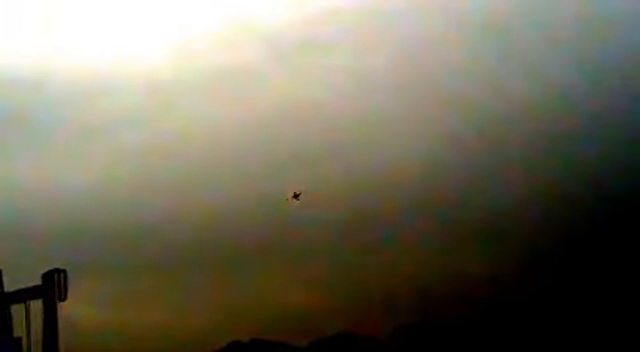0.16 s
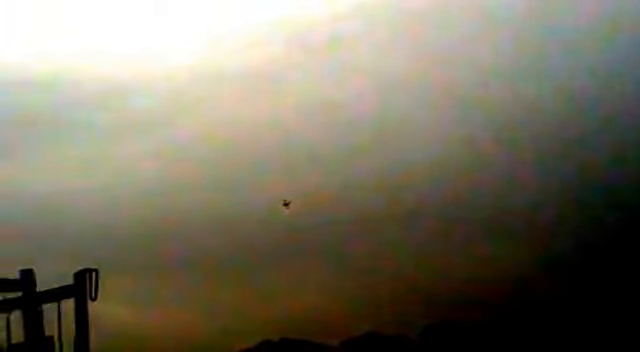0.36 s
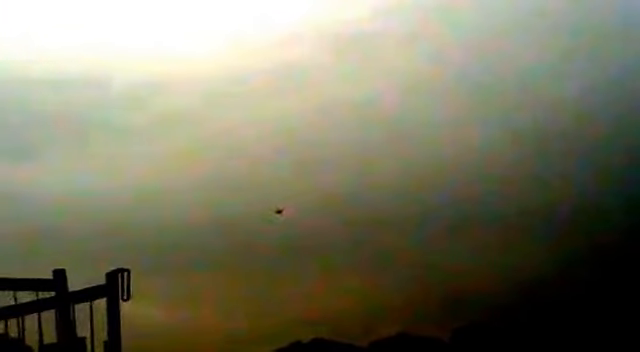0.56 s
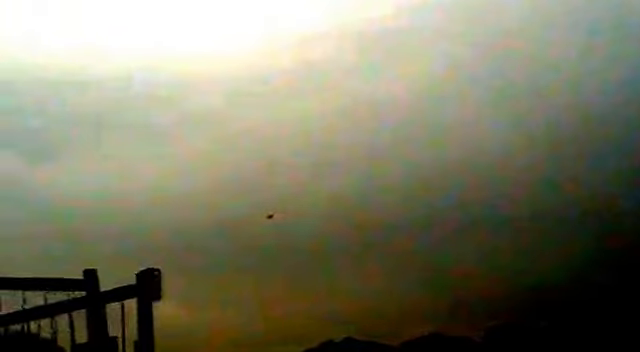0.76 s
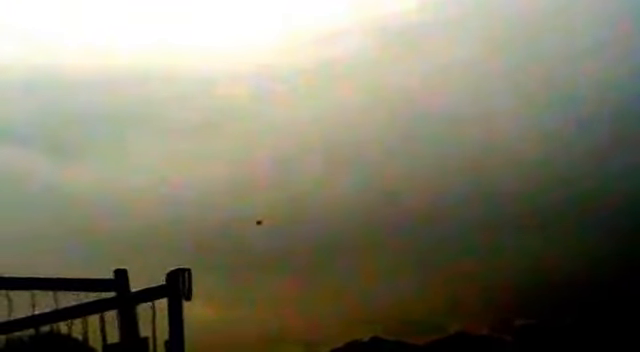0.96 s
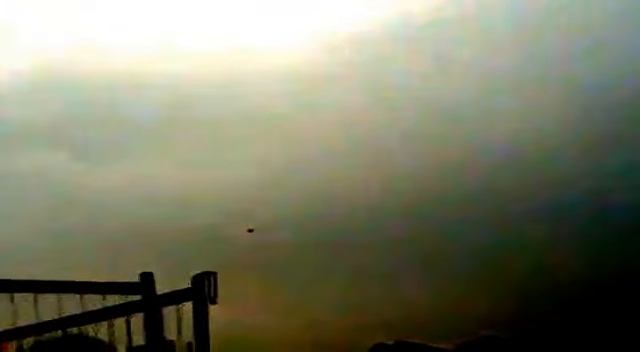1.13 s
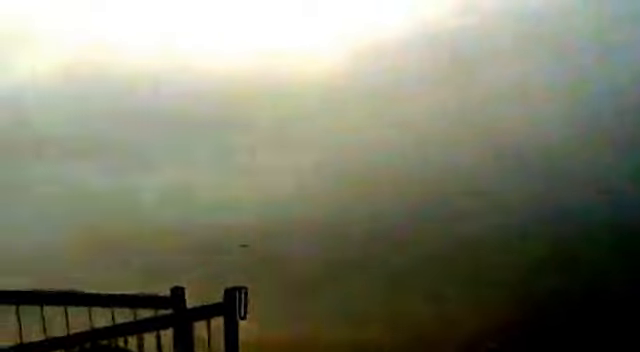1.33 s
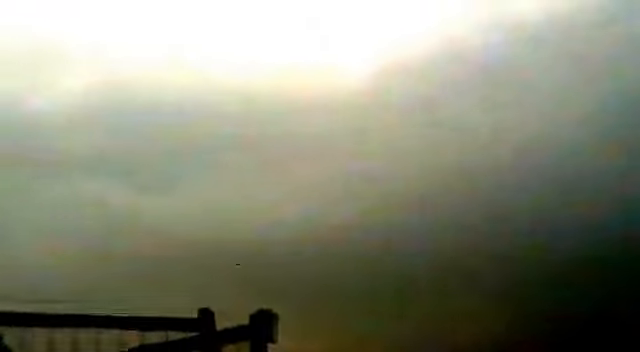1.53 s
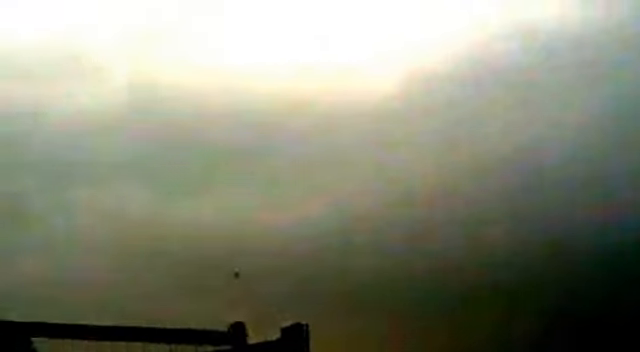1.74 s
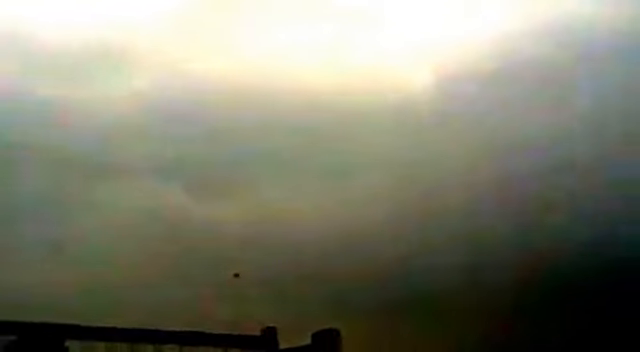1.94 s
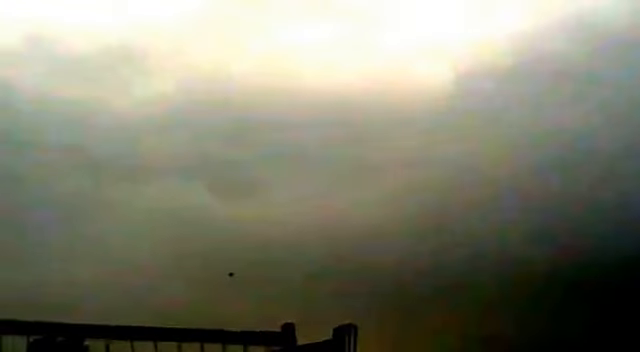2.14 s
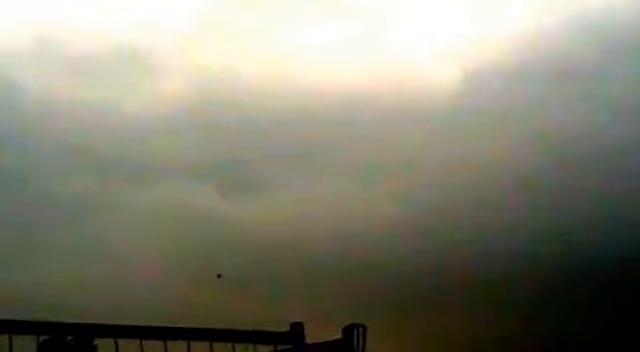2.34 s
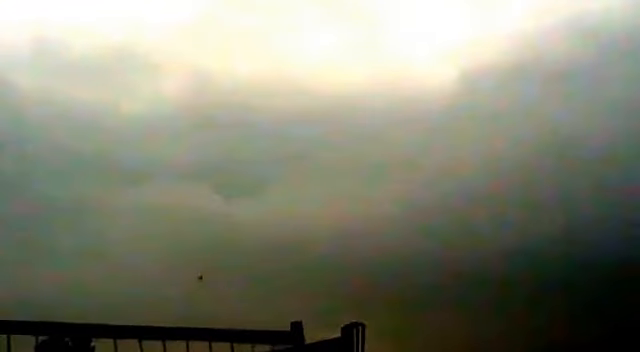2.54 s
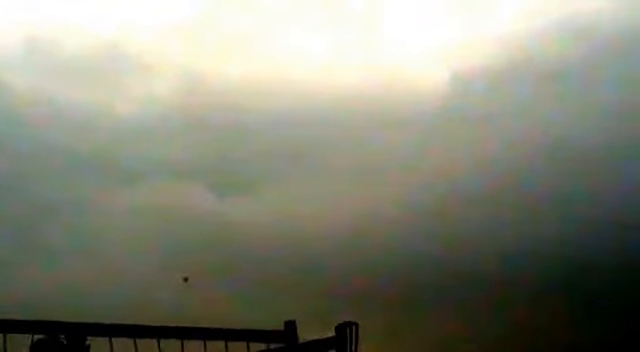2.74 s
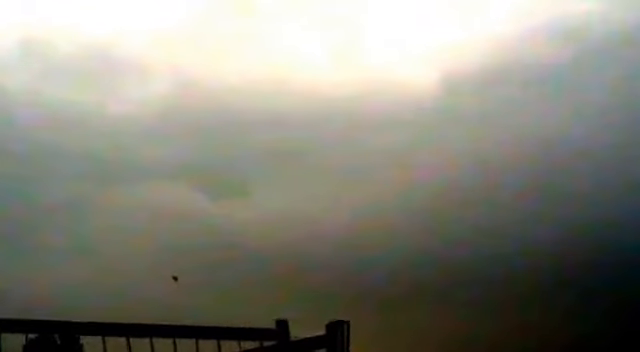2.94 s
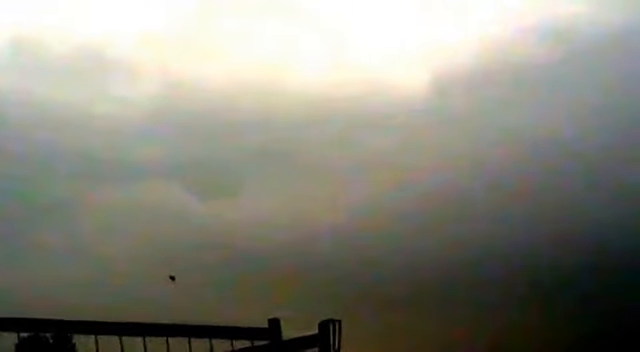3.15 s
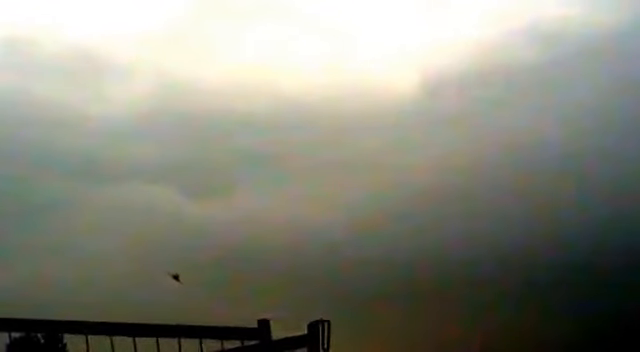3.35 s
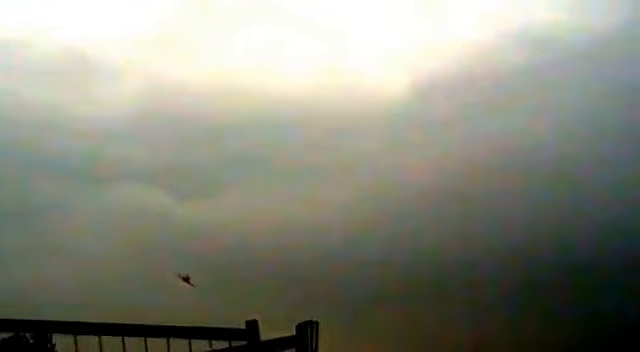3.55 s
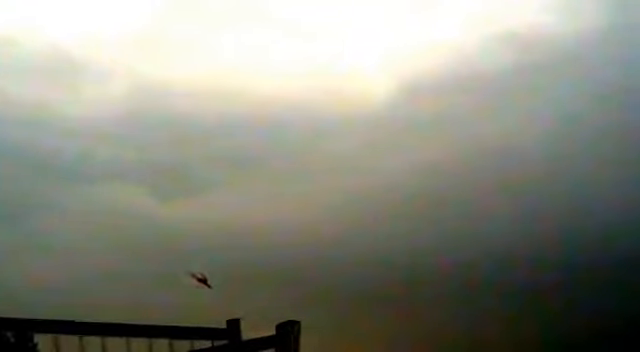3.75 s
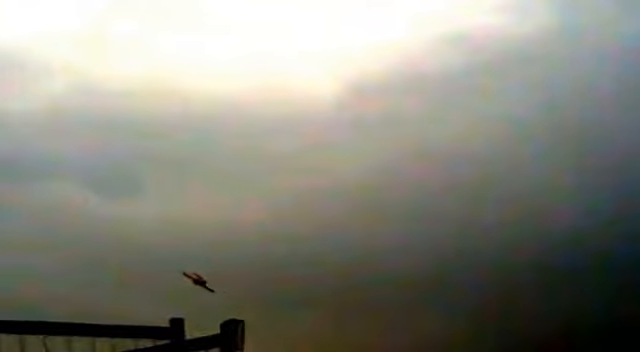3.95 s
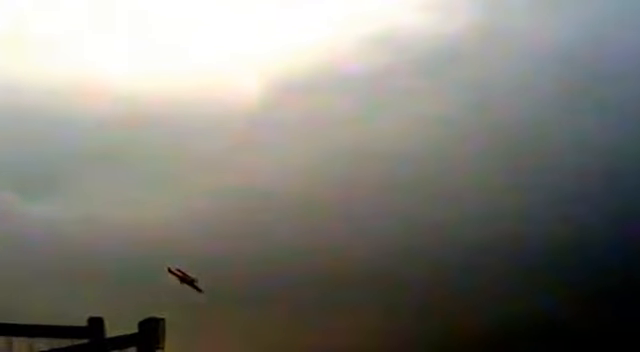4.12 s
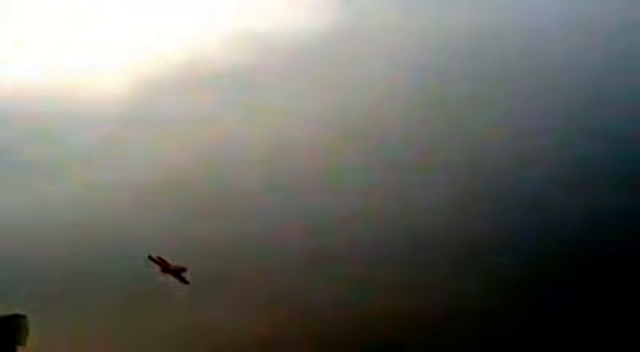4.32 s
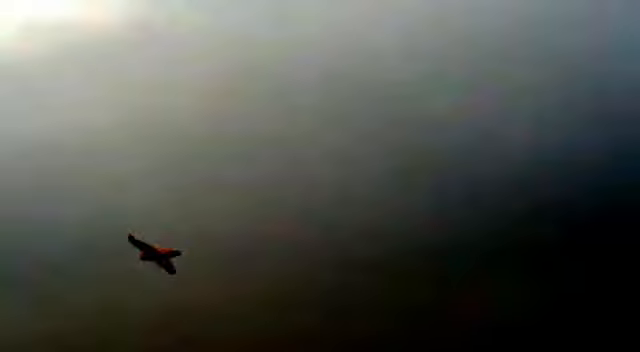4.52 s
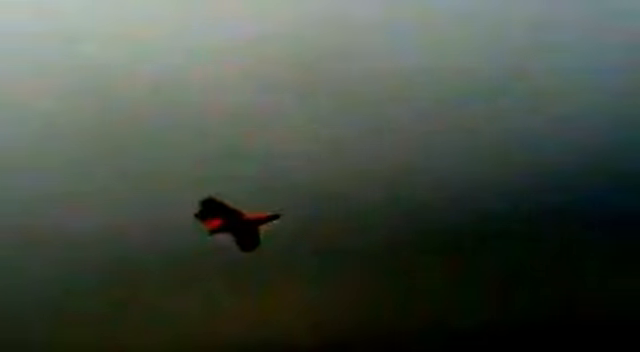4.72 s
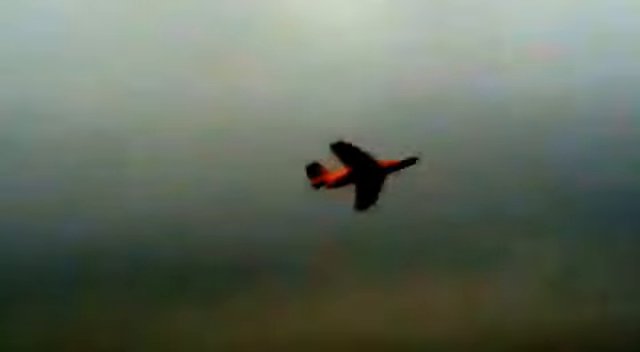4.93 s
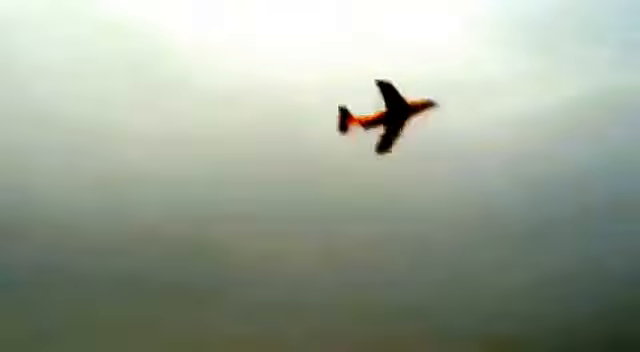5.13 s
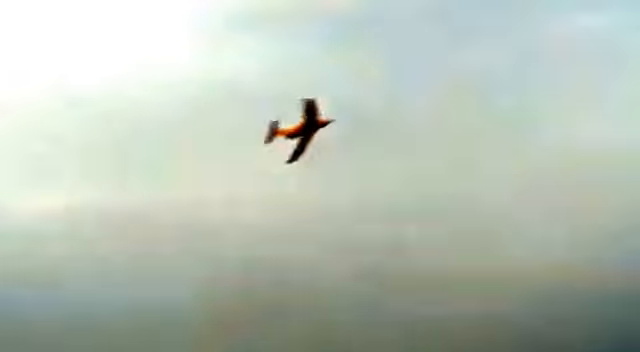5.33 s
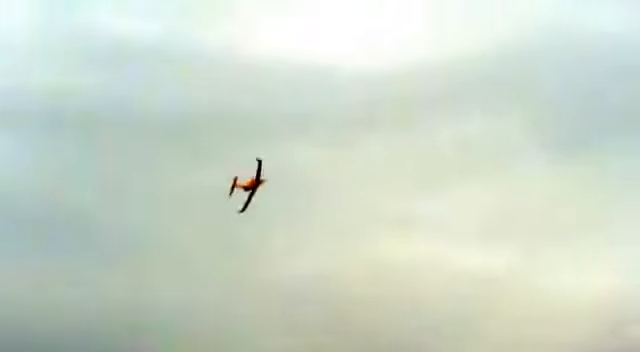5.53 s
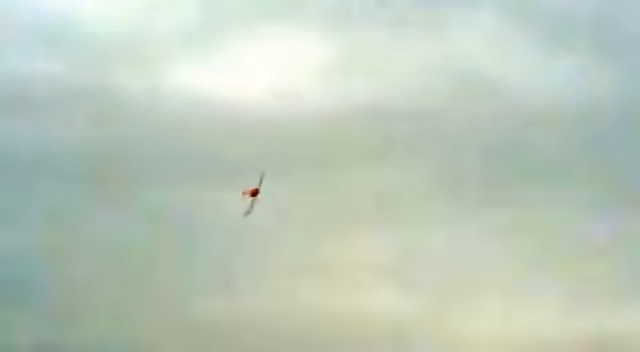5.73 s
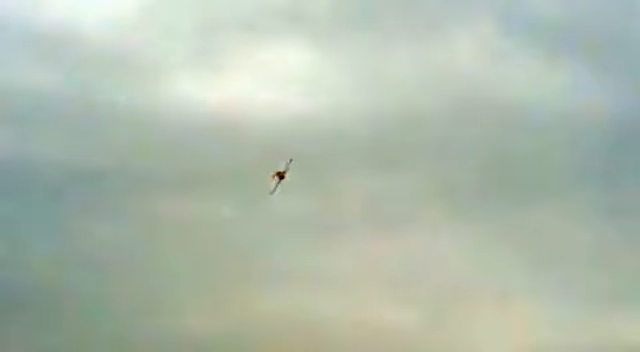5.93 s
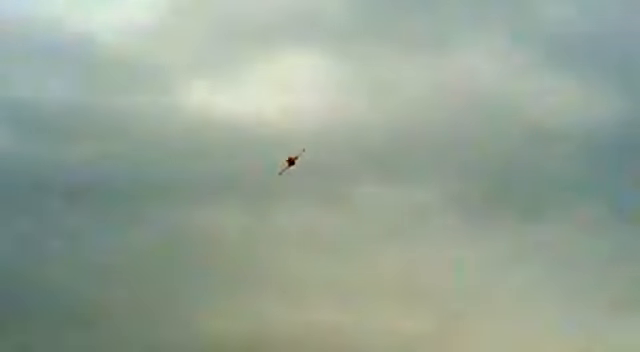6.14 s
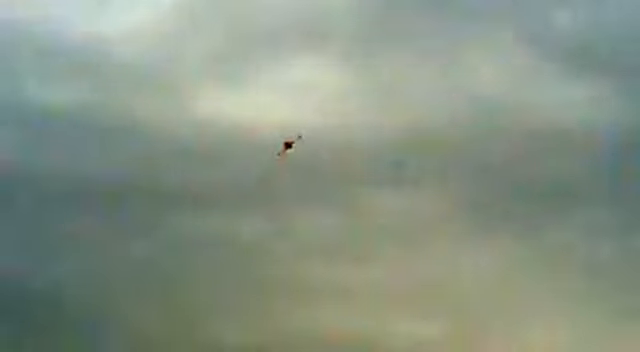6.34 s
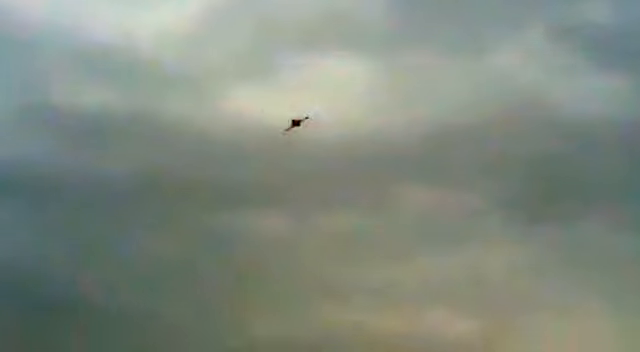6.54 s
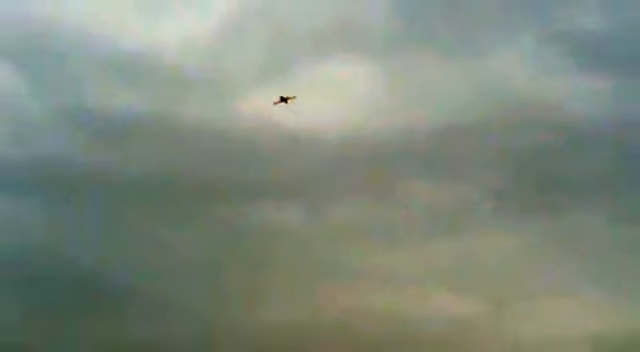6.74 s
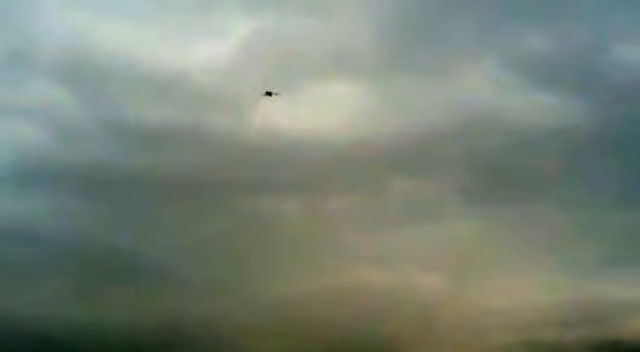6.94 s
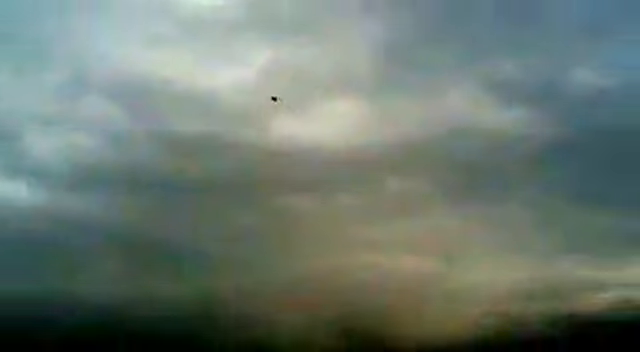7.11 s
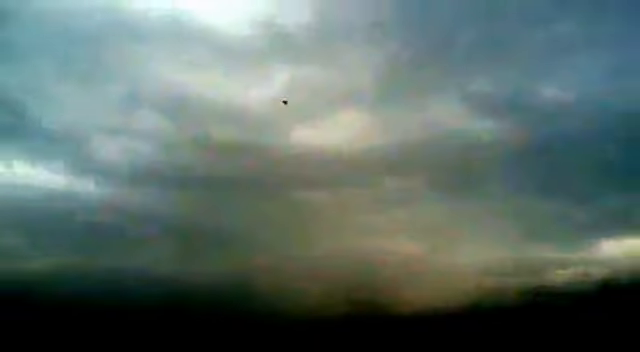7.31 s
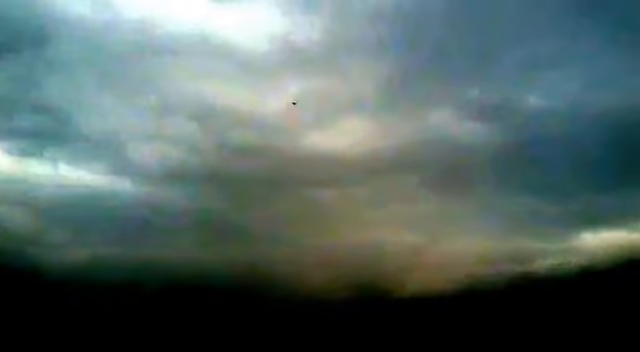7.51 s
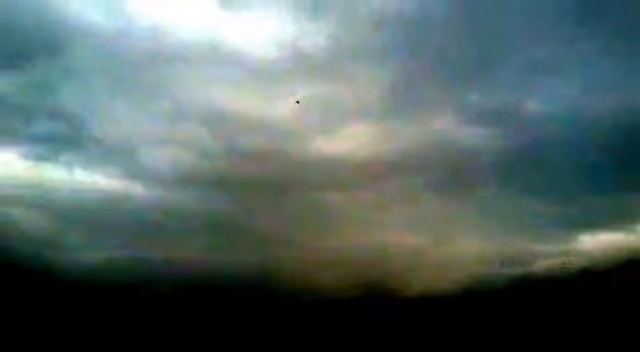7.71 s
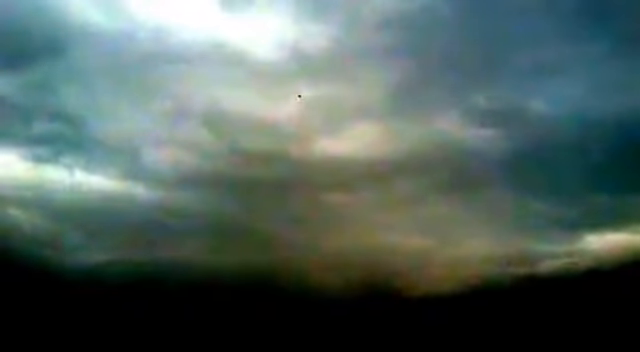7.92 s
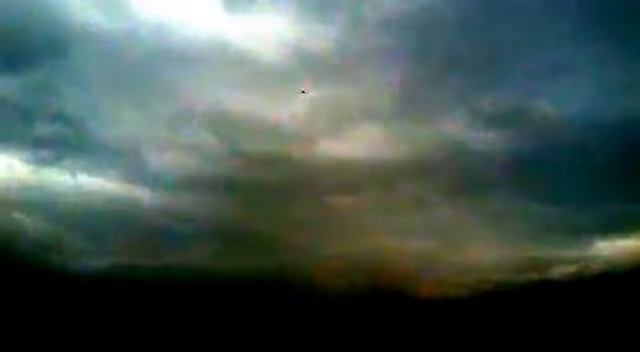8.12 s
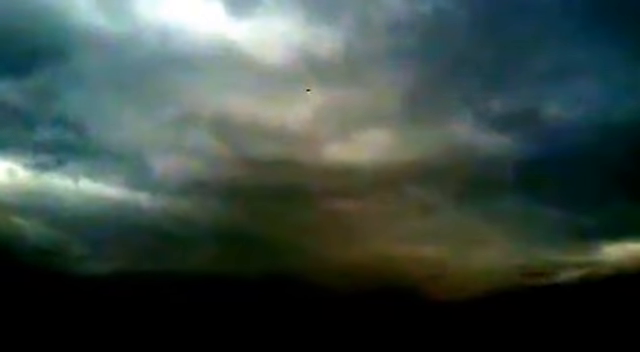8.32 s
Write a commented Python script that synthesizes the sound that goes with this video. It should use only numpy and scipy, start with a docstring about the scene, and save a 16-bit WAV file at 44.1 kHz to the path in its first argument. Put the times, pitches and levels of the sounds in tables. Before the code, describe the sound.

A small model jet with an electric ducted fan approaches outdoors, its high whine rising as the throttle opens, wrapped in bright hiss. Around five seconds it rushes past loudest and the pitch drops sharply, with rough sliding whistles. It then recedes, wavering and fading over a faint low rumble. Soft scuffs and tiny clicks sound close to the single microphone.

```python
"""Outdoors, under the flight path of a model jet with an eleven-blade electric ducted fan.
It opens its throttle, comes in low, passes overhead and flies off over a distant rumble.
The fan's whine is a set of Doppler-shifted sines; its hiss and the jet's roar are coloured noise.
A sweeping ground echo combs them. Two sliding whistles sound around the pass.
Close to the microphone, shaped bursts of noise make a few soft scuffs and clicks."""
import sys
import numpy as np
from scipy.fft import rfft, irfft, next_fast_len
from scipy.io import wavfile
from scipy.ndimage import uniform_filter1d, minimum_filter1d, map_coordinates

SR = 44100
rng = np.random.default_rng(int(sys.argv[2]) if len(sys.argv) > 2 else 0)


def dump(signal):
    """Clip the signal to [-1, 1] and save it as 16-bit WAV at the path in sys.argv[1]."""
    limited = np.clip(np.atleast_2d(signal).T, -1, 1)
    pcm = np.round(limited * 32767).astype(np.int16)
    wavfile.write(sys.argv[1], SR, pcm)


N = 373527
BLADES = 11
FULL_HZ = 4680  # blade-passing rate on board at full throttle
PASS_S, SPEED_M_PER_S, MISS_M = 5.383, 41.2, 14.16  # closest approach, speed, closest distance
SOUND_M_PER_S = 343


def amp(db):
    """Decibels to gain."""
    return 10 ** (np.asarray(db) / 20)


def unit(x):
    """Scale to rms 1."""
    return x / np.sqrt(np.mean(x ** 2) + 1e-20)


def seconds():
    """Time of each sample."""
    return np.arange(N) / SR


def curves(rows):
    """One value per sample for each column after the time."""
    knot_s, *columns = np.transpose(rows)
    return [np.interp(seconds(), knot_s, column) for column in columns]


def bell(centre_s, width_s):
    """A smooth bump of height 1."""
    return np.exp(-((seconds() - centre_s) / width_s) ** 2)


def wobble(knots_per_s):
    """A smooth random curve."""
    knots = rng.standard_normal(8192)
    return map_coordinates(knots, [np.arange(N) * knots_per_s / SR], mode="wrap")


def filtered(x, response):
    """Multiply the spectrum of x by a response of frequency."""
    size = next_fast_len(N + 8192)
    gain = response(np.fft.rfftfreq(size, 1 / SR))
    return irfft(rfft(x, size) * gain, size)[..., :N]


def coloured(x, spectrum):
    """Filter x through (Hz, dB) points on a log frequency axis."""
    point_hz, db = np.transpose(spectrum)
    return filtered(x, lambda hz: amp(np.interp(np.log(hz + 1), np.log(point_hz), db)))


def noise(spectrum):
    """Coloured noise of rms 1."""
    return unit(coloured(rng.standard_normal(N), spectrum))


def tone(hz, flutter_db, blur_rad):
    """A sine of rms 1 whose level and phase are shaken by turbulent air."""
    shake_rad = blur_rad * (wobble(35) + .5 * wobble(210))
    phase_rad = 2 * np.pi * np.cumsum(hz) / SR + shake_rad
    flutter = 2 * np.tanh((wobble(16) + wobble(70)) / 2)
    return unit(amp(flutter_db * flutter) * np.sin(phase_rad))


def flight():
    """Straight steady pass: distance in m, and angle in rad from the nose to the microphone."""
    ahead_m = SPEED_M_PER_S * (PASS_S - seconds())
    return np.hypot(ahead_m, MISS_M), np.arctan2(MISS_M, ahead_m)


def heard(beam_db, air_db_per_m):
    """Gain at the microphone: (nose, side, tail) beam, spreading with distance, air absorption."""
    nose_db, side_db, tail_db = beam_db
    metres, angle_rad = flight()
    axis_db = np.where(np.cos(angle_rad) > 0, nose_db, tail_db)
    beam_now_db = side_db + (axis_db - side_db) * np.cos(angle_rad) ** 2
    return amp(beam_now_db - air_db_per_m * metres) * MISS_M / metres


# Ground echo. Each row: time in seconds, lag in ms.
ECHO_LAG = [(.15, 1.45), (.8, 1.41), (1.75, 1.385), (2.05, 1.43), (3.7, 1.438), (4.3, 1.475), (4.75, 1.48),
            (4.95, 1.51), (5.08, 1.62), (5.2, 1.82), (5.4, 2.42), (5.6, 3.5), (5.75, 4.07), (5.9, 4.22),
            (6.25, 4.51), (6.72, 4.72), (7.1, 4.93), (7.4, 5.19), (7.65, 5.36), (8.47, 5.76)]


def over_ground(x, share):
    """Add the delayed ground echo; as its lag grows, the comb of notches sweeps down."""
    lag_ms, = curves(ECHO_LAG)
    late = np.arange(N) - lag_ms * SR / 1000
    echo = map_coordinates(x, [late], order=3)
    return (x + share * echo) / np.sqrt(1 + share ** 2)


# Throttle. Each row: time in seconds, blade-passing rate on board in Hz.
THROTTLE_HZ = [(0, 3562), (.17, 3587), (.25, 3740), (.4, 3830), (.47, 4080), (.515, 4320), (.56, 4392),
               (1.5, 4517), (1.83, 4537), (2, 4575), (2.3, 4586), (3.3, 4670), (4.6, 4686), (5.1, 4673),
               (5.6, 4687), (6, 4670), (6.65, 4720), (7.4, 4777), (8.47, 4812)]


def throttle_hz():
    """Blade-passing rate on board, before Doppler shift."""
    return curves(THROTTLE_HZ)[0]


# Swells in moving air. Each row: centre in seconds, half width in seconds, hiss in dB, whine in dB.
AIR_SWELLS = [(.12, .06, 2, 5), (.31, .11, -1, -18), (.52, 0.05, 2, 3), (0.64, 0.05, -6, 0),
              (.93, .07, -3, -7), (1.08, 0.043, 1.5, 10), (1.25, .12, -4.5, -15), (1.44, .04, 0, -5),
              (1.79, 0.12, 3.5, 4), (1.97, 0.086, -2, -3), (2.12, .05, 2, -4), (2.38, .09, 3.5, 0),
              (2.6, 0.08, -2.5, -6), (2.85, 0.14, 4, 2), (3.22, .06, -2, -11), (3.65, .3, -3, -3),
              (4.3, .2, 2, 3), (4.86, .13, -3, 2), (5.0, .03, 0, 5), (5.17, .04, 2, -3), (5.34, .08, 0, -6),
              (5.48, 0.045, 2, 0), (5.63, .05, 0, 8.5), (5.97, .11, 3, -6), (6.23, .04, 1, 6),
              (6.37, .28, -7.5, -16), (7.1, .07, 2, 2), (7.22, .025, -2.5, -6), (7.39, .07, 1.5, 5),
              (7.65, .09, 3, 4.5), (7.89, .06, 1, -4), (8.4, .3, 2.5, 0)]


def swells():
    """Swells and fades in dB for hiss and whine; a pure tone mostly swings further than noise."""
    return sum(np.outer([hiss_db, whine_db], bell(centre_s, width_s))
               for centre_s, width_s, hiss_db, whine_db in AIR_SWELLS)


# Outdoor background spectrum. Each row: frequency in Hz, density in dB per Hz.
OUTDOOR_SPECTRUM = [(20, -34), (40, -8), (62, 2.5), (100, -1.5), (180, -5), (380, -15), (520, -10.5),
                    (720, -4), (1000, -15), (1800, -19), (4000, -17.5), (7000, -35), (12000, -50.5),
                    (15000, -58)]


def outdoors(level_db=-39.5, gust_db=2.0, gust_edge_hz=90):
    """Distant low rumble with a faint hiss; its deepest part comes and goes."""
    air = noise(OUTDOOR_SPECTRUM)
    deep = filtered(air, lambda hz: 1 / (1 + (hz / gust_edge_hz) ** 4))
    gust = amp(gust_db * wobble(9)) - 1
    return amp(level_db) * (air + gust * deep)


# Unbalanced rotor. Each row: multiple of the shaft rate, level in dB at the closest distance,
# forward cone from and to in degrees off the nose, spill outside it in dB, phase blur in rad.
ROTOR_TONES = [(1, -31.5, 14.5, 58, -22, 0.084), (10, -17.5, 10.5, 28, -17, 1.1)]


def side_tones(hz):
    """Tones of the unbalanced rotor, each thrown forwards in a cone round the nose."""
    metres, angle_rad = flight()
    deg = np.degrees(angle_rad)
    out = np.zeros(N)
    for multiple, db, from_deg, to_deg, spill_db, blur_rad in ROTOR_TONES:
        cone = 1 / (1 + (from_deg / deg) ** 8) / (1 + (deg / to_deg) ** 12)
        side = tone(multiple * hz / BLADES, 1.0 + 2 * blur_rad, blur_rad)
        out += amp(db) * (cone + amp(spill_db)) * MISS_M / metres * side
    return out


# (nose, side, tail) dB at the closest distance, before air absorption
WHINE_DB, OCTAVE_DB = (-16, -17, -9.5), (-37.5, -37, -30.5)
SKIRT_DB = -9  # relative to the whine
FAR_HUM_S, FAR_HUM_WIDTH_S, FAR_HUM_DB = 1.45, 1.2, -55.5


def fan_tones(coming_share=0.59, leaving_share=.3, overhead_loss=.5):
    """Doppler-shifted whine, skirt, octave and side tones; all but the octave beat with the echo."""
    metres, angle_rad = flight()
    hz = throttle_hz() / (1 - SPEED_M_PER_S / SOUND_M_PER_S * np.cos(angle_rad))
    hiss_swell_db, whine_swell_db = swells()

    # the tones are most ragged straight overhead
    overhead = MISS_M / metres
    blur_rad = .2 + .3 * overhead + .6 * overhead ** 6
    whine = heard(WHINE_DB, air_db_per_m=.015) * tone(hz, 1.36 + 1.45 * overhead, blur_rad)
    # rough band from blades chopping turbulent air
    skirt = amp(SKIRT_DB) * heard(WHINE_DB, air_db_per_m=.04) * tone(hz, flutter_db=4, blur_rad=3)
    octave = heard(OCTAVE_DB, air_db_per_m=.15) * tone(2 * hz, 3.5, 2 * blur_rad)
    tones = amp(whine_swell_db) * whine + amp(hiss_swell_db) * skirt + side_tones(hz)

    share = np.interp(angle_rad, [0, np.pi], [coming_share, leaving_share])
    tones = over_ground(tones, share * (1 - overhead_loss * overhead))
    # the shaft's hum carries faintly from far off
    hum = tone(hz / BLADES, flutter_db=1.5, blur_rad=.1)
    far_hum = amp(FAR_HUM_DB) * bell(FAR_HUM_S, FAR_HUM_WIDTH_S) * hum
    return tones + amp(hiss_swell_db) * octave + far_hum


def sped(x, octaves_per_octave=.7):
    """The fan's resonances rise with its speed: play the hiss faster or slower."""
    rate = (throttle_hz() / FULL_HZ) ** octaves_per_octave
    return map_coordinates(x, [np.cumsum(rate)], order=5, mode="mirror")


# Top of the hiss. Each row: centre in seconds, half width in seconds, level change in dB.
TREBLE_FLARES = [(.35, .25, -3), (2.35, .25, -3), (3.45, .5, 3.5), (4.88, .07, 4), (5.17, .04, -2),
                 (5.33, .07, -4), (5.5, .035, 2.5), (5.59, .035, -3), (5.69, .03, 5), (5.77, .03, -2),
                 (6.17, .12, -4), (8.0, .45, 4)]


def dulled(x, edge_hz=5200, air_db_per_m=.02, flare_edge_hz=4900):
    """Distance takes the top off the hiss; what is left of it flares and dims."""
    def above(signal, edge):
        return filtered(signal, lambda hz: 1 - 1 / (1 + (hz / edge) ** 12))

    metres, _ = flight()
    x = x - (1 - amp(-air_db_per_m * metres)) * above(x, edge_hz)
    flare_db = sum(db * bell(centre_s, width_s) for centre_s, width_s, db in TREBLE_FLARES)
    return x + (amp(flare_db) - 1) * above(x, flare_edge_hz)


# Fan hiss from nose, belly and tail, then a duller patch of hiss, exhaust roar from ahead and
# behind, and fine treble. Each row: frequency in Hz, density in dB per Hz.
NOSE_HISS = [(1200, -32), (2400, -17), (2800, -8), (3500, 4), (4300, 3.5), (4900, 5), (5400, -4),
             (6000, -13), (7000, -25), (10000, -66)]
BELLY_HISS = [(400, -34), (1200, -21), (2300, -15), (2900, -5), (3600, -1.5), (4500, 5.5), (5200, 1.5),
              (5800, -6.5), (6500, -23.5), (7500, -54), (10000, -74)]
TAIL_HISS = [(1200, -75), (2300, -23.5), (2900, -7.5), (3500, 4.5), (4300, 4.5), (4800, -0.5), (5400, -13),
             (6200, -21.5), (7500, -30.5), (10000, -76)]
DULL_HISS = [(1500, -21), (2100, -4), (2450, -6), (2620, 5), (3500, -4), (5000, -41)]
AHEAD_ROAR = [(30, -40), (90, -14), (220, 1.5), (380, -2.5), (520, -2.5), (740, 4.5), (950, 0), (1080, 4),
              (1220, -5), (1500, 0.5), (2100, 0.5), (2450, -1), (3200, 8), (5000, -70)]
BEHIND_ROAR = [(30, -46), (90, -12), (240, 2.5), (420, -1), (660, 3), (840, -2), (1080, 0), (1280, 2.5),
               (1500, -1), (2200, -0.5), (2500, 0.5), (3200, 9), (5000, -70)]
TREBLE_SPRAY = [(4000, -7.5), (6300, 5.5), (8000, 1.5), (9300, -1.5), (10500, -9.5), (11500, -20),
                (12500, -38), (15000, -55)]
# (nose, side, tail) dB at the closest distance, before air absorption
HISS_DB, ROAR_DB = (-6.3, -9.3, -7.0), (-18.9, -26.5, -18.2)
SPRAY_DB = (-29.5, -29.5, -22.5)
THROTTLE_DB_PER_OCTAVE = 14  # a faster fan hisses louder
DULL_S, DULL_WIDTH_S, DULL_DB = 2.15, 0.69, -39.5
ECHO_SHARE, OVERHEAD_LOSS = 0.55, .3  # hiss returned by the ground; part of that lost overhead


def airflow(belly_before=0.48, belly_after=1.23):
    """Fan hiss changes colour from nose to belly to tail; the exhaust adds roar and fine treble."""
    metres, angle_rad = flight()
    overhead = MISS_M / metres
    coming = np.cos(angle_rad / 2) ** 2
    belly_power = belly_before * coming + belly_after * (1 - coming)
    belly = np.clip(0.82 * overhead ** belly_power, 0, 1)
    shares = [(1 - belly) * coming, belly, (1 - belly) * (1 - coming)]
    views = [NOSE_HISS, BELLY_HISS, TAIL_HISS]
    hiss = sum(np.sqrt(share) * noise(view) for share, view in zip(shares, views))

    # moving air along the path makes hiss and spray twinkle
    twinkle_db = .5 * wobble(22)
    speed_db = THROTTLE_DB_PER_OCTAVE * np.log2(throttle_hz() / FULL_HZ)
    fan = amp(speed_db + swells()[0] + twinkle_db)
    hiss = fan * heard(HISS_DB, air_db_per_m=.033) * dulled(sped(hiss))
    hiss = hiss + amp(DULL_DB) * bell(DULL_S, DULL_WIDTH_S) * noise(DULL_HISS)

    roar = np.sqrt(coming) * noise(AHEAD_ROAR) + np.sqrt(1 - coming) * noise(BEHIND_ROAR)
    roar = heard(ROAR_DB, air_db_per_m=0.0138) * roar
    spray = fan * heard(SPRAY_DB, air_db_per_m=.105) * noise(TREBLE_SPRAY)
    # the ground returns long waves well and scatters the shortest ones away
    hiss = over_ground(hiss, ECHO_SHARE * (1 - OVERHEAD_LOSS * overhead))
    return over_ground(roar, share=.7) + hiss + spray


# Scuffs near the microphone. Each row: start in seconds, length in seconds, level in dB.
SCUFF_STROKES = [(0.039, 0.13, -33.5), (0.68, 0.072, -35), (0.747, 0.087, -31.5), (1.4, 0.12, -32.5),
                 (2.115, 0.088, -36), (2.297, 0.036, -39), (7.642, 0.032, -41)]
# Their spectrum. Each row: frequency in Hz, density in dB per Hz.
SCUFF_SPECTRUM = [(150, -17), (700, -3.5), (1800, -9.5), (3800, 2.5), (5200, -13), (6800, -10.5),
                  (10000, -14.5), (12000, -17), (13500, -49)]


def scuffs(grain_db=3.8):
    """Short grainy rubs: noise roughened by a fast wobble, swelling and fading as half sines."""
    t = seconds()
    strokes = sum(amp(db) * np.sin(np.pi * np.clip((t - start_s) / length_s, 0, 1))
                  for start_s, length_s, db in SCUFF_STROKES)
    grain = amp(grain_db * wobble(350))
    return strokes * unit(noise(SCUFF_SPECTRUM) * grain)


# Small clicks. Each row: start in seconds, nominal peak in dB, sharpness from 0 to 1.
CLICK_HITS = [(0.081, -27, 0), (.284, -28, 0.15), (.717, -20, 0.1), (.732, -27, .3), (.767, -19, 1),
              (0.7777, -11, 0.25), (0.812, -19, 0), (1.885, -34, 0.3), (7.5672, -5, 0.9)]
# Soft and sharp click spectra. Each row: frequency in Hz, density in dB per Hz.
SOFT_SPECTRUM = [(500, -19), (2000, -4.5), (3800, 2), (5000, 1), (7000, -6), (11000, -23), (14000, -43)]
SHARP_SPECTRUM = [(500, -26), (2500, -16), (4500, 7), (7000, -15), (9900, -16), (11300, -6), (12800, -11),
                  (15000, -30)]


def clicks(t60_s=0.0082, peak_over_rms_db=4.5):
    """Tiny dry contacts: decaying noise cracks of a few milliseconds, brighter when sharper."""
    t = seconds()
    soft, sharp = noise(SOFT_SPECTRUM), noise(SHARP_SPECTRUM)
    out = np.zeros(N)
    for start_s, peak_db, sharpness in CLICK_HITS:
        decay_db = 60 * abs(t - start_s) / t60_s
        crack = (t >= start_s) * amp(peak_db - peak_over_rms_db - decay_db)
        out += crack * ((1 - sharpness) * soft + sharpness * sharp)
    return out


# Two lower, rougher whistles. Each row: time in seconds, pitch in Hz, level in dB.
UPPER_SLIDE = [(4.3, 4080, -35), (4.7, 4060, -28), (4.88, 4040, -28), (5.0, 3950, -23), (5.09, 3780, -20),
               (5.18, 3600, -30)]
LOWER_SLIDE = [(5.08, 3400, -30), (5.16, 3345, -16), (5.25, 3260, -15.5), (5.38, 3110, -16.5),
               (5.47, 2990, -28), (5.68, 2840, -29), (6.1, 2730, -31), (6.3, 2700, -41)]


def whistle(rows, blur_rad, fade_s=.06):
    """A rough sine that slides down around the pass."""
    hz, db = curves(rows)
    t = seconds()
    to_nearest_end_s = np.minimum(t - rows[0][0], rows[-1][0] - t)
    fade = np.clip(to_nearest_end_s / fade_s, 0, 1)
    return fade * amp(db) * tone(hz, flutter_db=2.2, blur_rad=blur_rad)


def scene():
    """The background, the jet and the small noises nearby, on one microphone."""
    whistles = whistle(UPPER_SLIDE, blur_rad=.9) + whistle(LOWER_SLIDE, blur_rad=.55)
    return (outdoors() + fan_tones() + airflow() + scuffs() + clicks() + whistles)[None]


def gain_control(x, threshold_db=-19, slope=0.32):
    """Turn everything down while the quarter-second level is over the threshold."""
    power = abs(uniform_filter1d(x ** 2, size=SR // 4))
    level_db = 10 * np.log10(power + 1e-12)
    return x * amp(-slope * np.maximum(level_db - threshold_db, 0))


def record(dry, ceiling=.93, top_hz=15650):
    """Ride the gain, limit the highest peaks and keep nothing above the band limit."""
    x = gain_control(dry)
    needed = minimum_filter1d(ceiling / np.maximum(abs(x), ceiling), size=301)
    limited = x * uniform_filter1d(needed, size=301)
    return filtered(limited, lambda hz: hz < top_hz)


dry = scene()
out = record(dry)
dump(out)
```